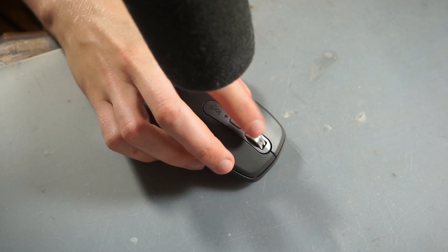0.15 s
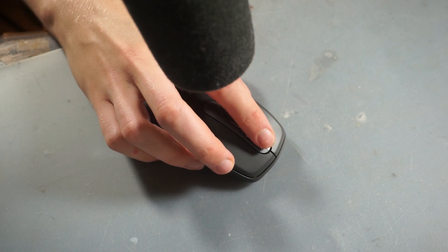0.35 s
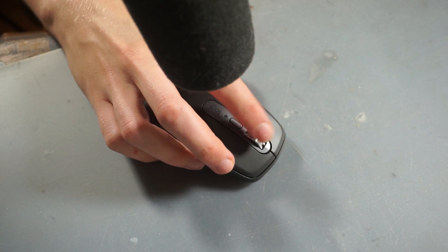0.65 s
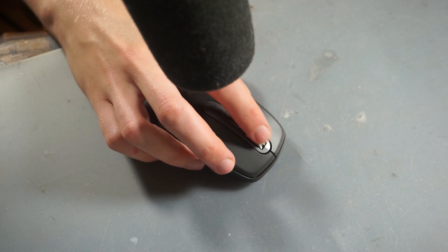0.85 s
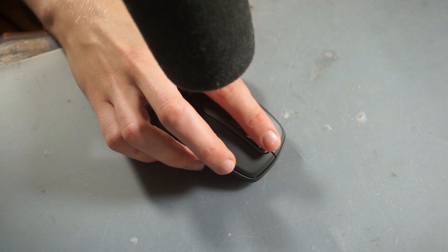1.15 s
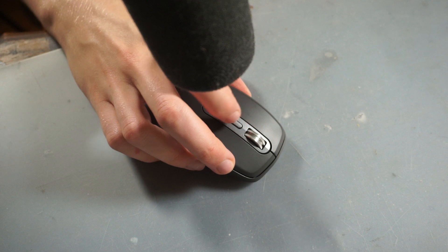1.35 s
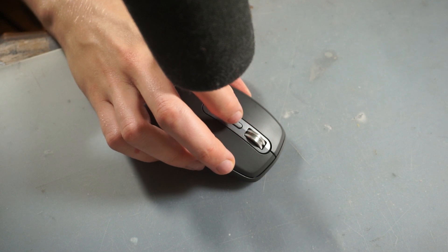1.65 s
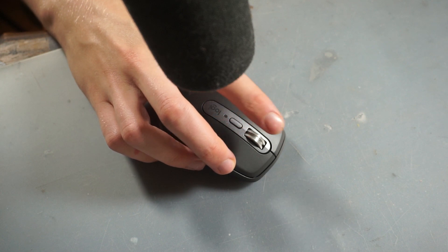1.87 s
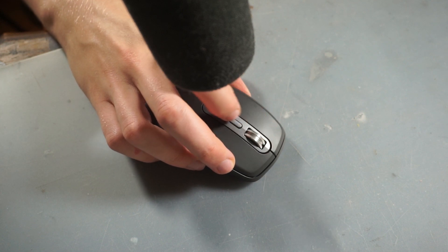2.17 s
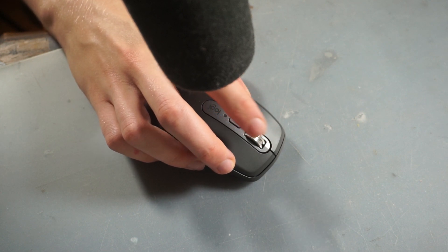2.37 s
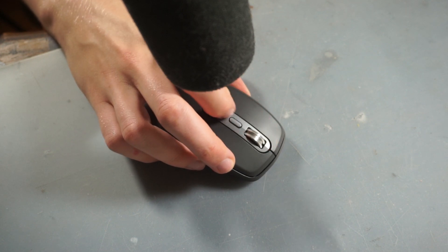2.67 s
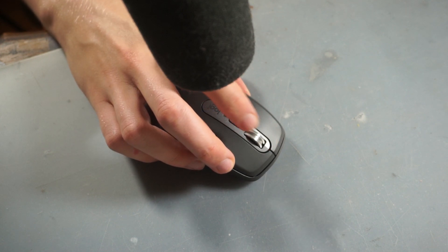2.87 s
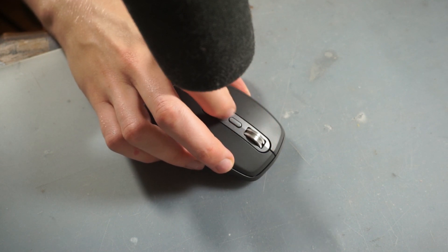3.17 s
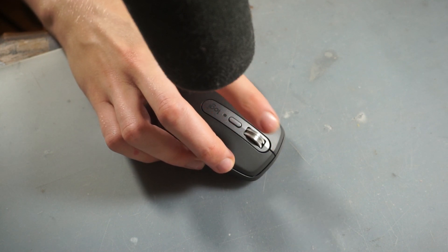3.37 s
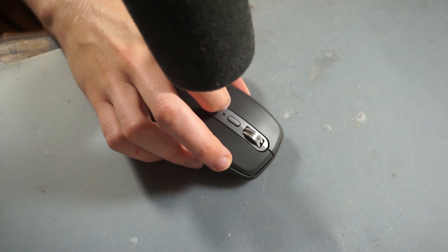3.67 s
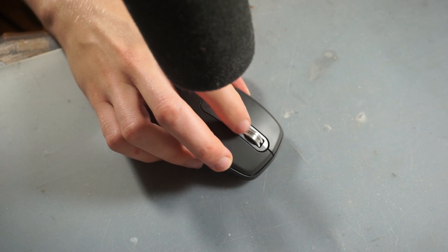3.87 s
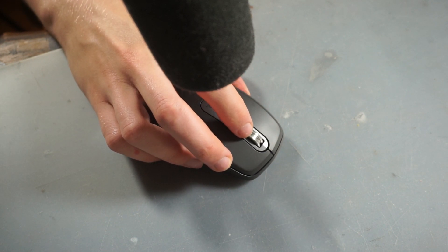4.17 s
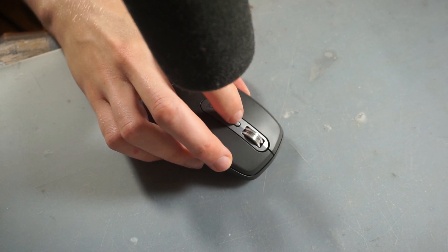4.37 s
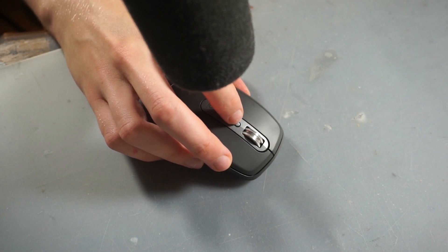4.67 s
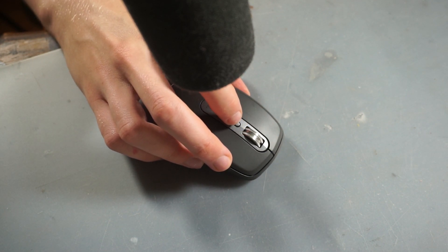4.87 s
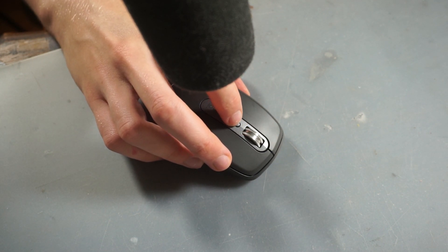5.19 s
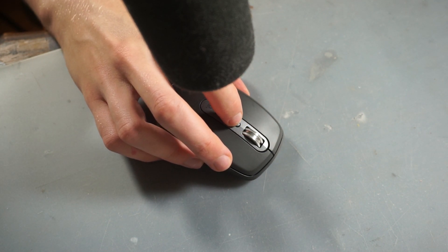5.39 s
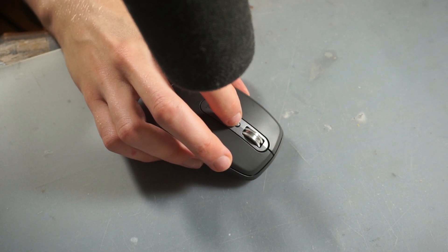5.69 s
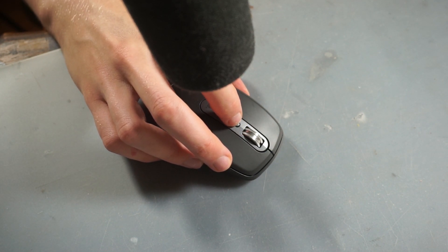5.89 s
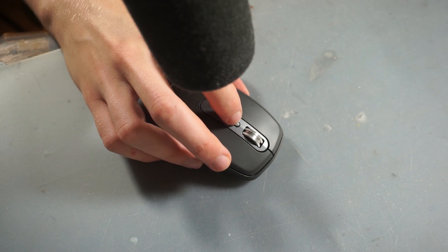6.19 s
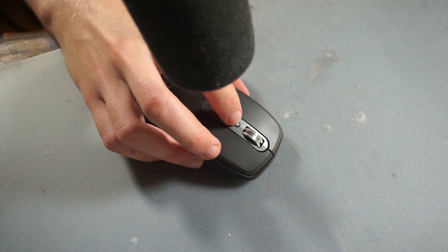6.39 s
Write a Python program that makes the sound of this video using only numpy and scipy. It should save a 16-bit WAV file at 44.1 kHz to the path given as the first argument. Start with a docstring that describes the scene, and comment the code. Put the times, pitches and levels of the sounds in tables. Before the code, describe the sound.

A hand handles a computer mouse, captured close. Muffled bumps through the desk come first, then snappy wheel slaps with woody thuds, hollow little tocks and brief squeaky skin-on-wheel scrapes. The second half is sparser: light ticks, then evenly paced sharp clicks with soft releases. A faint low rumble and steady hiss lie beneath, in a small-sounding, nearly dry room.

```python
"""A low room rumble with preamplifier hiss above it, then a hand taps, scrolls and clicks a computer mouse.
The floor is noise shaped in its spectrum; the desk rocks on its legs as one low, wandering mode.
The fingertip sticks and slips on the wheel, and these slips excite the modes of switch, shell and desk.
Every blow is a smooth push ringing desk and shell; most also chatter through the button and switch.
Knocks of the wheel add close modes that beat, and all contacts but the rocking leave a faint echo."""
import sys
import numpy as np
from scipy import signal
from scipy.fft import rfft, irfft
from scipy.io import wavfile
from scipy.ndimage import uniform_filter1d

SR = 44100
rng = np.random.default_rng(int(sys.argv[2]) if len(sys.argv) > 2 else 0)


def store_pcm(level_fs):
    """Save levels as 16-bit WAV."""
    pcm = np.round(np.clip(level_fs, -1, 1) * 32767).astype(np.int16)
    wavfile.write(sys.argv[1], SR, np.atleast_2d(pcm).T)


def voltage_ratio(level):
    """Linear amplitude factor for a level in decibels (scalar or array-like)."""
    return 10 ** (np.asarray(level, float) / 20)


N = 288414
T = np.arange(N) / SR  # seconds

# modes of the desk top: f/Hz, relative level before contact smoothing/dB, t60/s
DESK = [(30, 9, 0.087), (117, -1.5, 0.27), (146.6, -2.5, 0.3), (171, 13, 0.031), (199.7, -11, 0.22),
        (247, -16.5, 0.32), (290, -8, 0.13), (324, -28.5, 0.66), (413, -16, 0.18), (610, -15.5, 0.11)]
# modes of the plastic shell: f/Hz, relative level before contact smoothing/dB, t60/s
SHELL = [(939, 0.5, 0.027), (1094, -2, 0.04), (1226, 4, 0.028), (1364, -3, 0.012)]
# modes of the wheel in its cradle: f/Hz, relative level before contact smoothing/dB, t60/s
WHEEL = [(1170, 0, .028), (1250, -28, .22), (1275, -28, .1), (1325, 0, .028)]
# modes of the button cap: f/Hz, relative level/dB, t60/s
BUTTON = [(1610, 2, 0.0043), (1903, -15, 0.052), (2316, -6, 0.0072), (2583, -7.5, 0.023),
          (2780, -2.5, 0.0057), (3355, -4, 0.013), (3985, -17.5, 0.035)]
# modes of the switch: f/Hz, relative level/dB, t60/s
SWITCH = [(4570, -21, 0.027), (4840, -30, 0.026), (4920, 5.5, 0.0043), (5615, -4.5, 0.0053)]
# highest modes, heard as a crack: f/Hz, relative level/dB, t60/s
CRACK = [(6090, -1, 0.009), (6880, 1.5, 0.0091), (7280, -3, 0.0098), (8230, -1.5, 0.009),
         (9270, -1, 0.0072), (10870, -5.5, 0.011), (11450, -1, 0.006), (13100, -9, 0.015),
         (14900, -54, 0.006)]
# button presses: t/s, reference level of their parts and of the rocking/dB
PRESSES = [(4.685, -33), (5.15, -32), (5.521, -33), (5.834, -34.5), (6.404, -33)]
# dull button releases: t/s, reference level of their parts and of the rocking/dB
RELEASES = [(4.835, -34.5), (5.309, -34.5), (5.62, -34), (5.941, -34)]
# finger slapping the wheel, with its bounces: t/s, shell peak/dB, thud peak/dB, snap reference level/dB
KNOCKS = [(1.335, -40, -37.5, -38), (1.339, -37, -31, -34), (1.343, -46.5, -30.5, -39),
          (2.178, -46.5, -31.5, -48), (2.668, -45.5, -49.5, -51.5), (2.675, -55, -41.5, -49.5),
          (3.119, -32.5, -27, -29), (3.134, -54, -55, -63), (3.148, -56, -40, -62),
          (3.592, -44, -40.5, -46.5), (3.604, -64, -51, -50), (3.956, -82, -46.5, -69),
          (4.24, -50, -43, -78), (4.409, -59, -59.5, -57)]
# the wheel knocking back: t/s, wheel peak/dB, snap reference level/dB
TOCKS = [(1.397, -46.5, -46.5), (2.102, -44, -41.5), (2.231, -43, -44.5), (4.107, -47.5, -46.5),
         (4.736, -45.5, -46), (5.2, -40.5, -46), (5.883, -45.5, -47.5), (6.455, -40, -47)]


def add(out, s, sound):
    """Superposition: mix a sound in at time s."""
    i = max(int(s * SR), 0)
    out[i:i + len(sound)] += sound[:len(out) - i]


def peak(x, db):
    """Amplitude normalisation: scale to a peak level in dB."""
    return x * voltage_ratio(db) / np.abs(x).max()


def unit(x):
    """Power normalisation: scale to rms 1."""
    return x / np.sqrt(np.mean(x ** 2))


def ring(modes, seconds=0.23, sign=-1):
    """Modal superposition: an impulse response of damped sines; sign -1 opposes neighbours in phase."""
    t = T[:int(seconds * SR)]
    out = np.zeros(len(t))
    for k, (hz, db, t60) in enumerate(modes):
        decay = 1000. ** (-t / t60)
        out += sign ** k * voltage_ratio(db) * np.sin(2 * np.pi * hz * t) * decay
    return out


def soft(x, ms):
    """Contact time as a low-pass: a rounded force pulse about this long dulls the ring."""
    return signal.fftconvolve(x, np.hanning(int(ms * SR / 1000) + 3))


def hiss():
    """Spectral shaping of random noise: room rumble below, preamplifier hiss above."""
    # noise spectrum: f/Hz, relative density per Hz/dB
    noise_spectrum = [(12, -34), (20, -1.5), (40, -1.5), (56, 0.5), (86, -14.5), (172, -23), (262, -24),
                      (472, -31), (1190, -35.5), (1530, -37.5), (12400, -37.5), (16000, -39)]
    level_db = -68  # rms
    hz, db = np.transpose(noise_spectrum)
    f = np.maximum(np.arange(N // 2 + 1) * SR / N, 1)
    gain = voltage_ratio(np.interp(np.log(f), np.log(hz), db))
    noise = irfft(rfft(rng.standard_normal(N)) * gain, N)
    return voltage_ratio(level_db) * unit(noise)


def rocking():
    """A low mode of the desk on its legs: pushes add energy to one swing, held while the hand moves."""
    # pushes of the hand: t/s, swing amplitude/dB, hold/ms, t60/s
    hand_pushes = [(0.004, -38, 16, 0.48), (0.341, -50, 17, 0.27), (0.419, -47.5, 24, 0.55),
                   (0.463, -40, 42, 0.39), (0.81, -44, 32, 0.15), (0.894, -40.5, 49, 0.14),
                   (1.008, -53, 8.2, 0.24), (1.317, -45, 9, 0.23), (1.874, -60.5, 18, 0.83),
                   (2.006, -33, 4.1, 0.25), (2.156, -42, 11, 0.17), (2.617, -55, 25, 0.3),
                   (2.667, -42.5, 4.5, 0.37), (3.109, -31.5, 5.1, 0.47), (3.552, -39, 13, 0.32),
                   (3.594, -44, 16, 0.49), (3.956, -44.5, 7.3, 0.28), (4.409, -48.5, 8.8, 0.18),
                   (6.265, -65, 20, 0.26)]
    rock_hz, rise_ms = 59.8, 5
    click_hold_ms, click_t60 = 16, .33
    pushes = list(hand_pushes)
    # (clicks, swing re click level in dB, lead in ms): the desk moves before the switch snaps
    for clicks, rock_db, lead_ms in ((PRESSES, -18.5, 6.3), (RELEASES, -12.5, 3.4)):
        pushes += [(s - lead_ms / 1000, db + rock_db, click_hold_ms, click_t60) for s, db in clicks]

    energy, t = np.zeros(N), T[:SR]
    rise = np.sin(np.pi / 2 * np.clip(t * 1000 / rise_ms, 0, 1))
    for s, db, hold_ms, t60 in pushes:
        fall = 1000. ** (-np.maximum(t - (rise_ms + hold_ms) / 1000, 0) / t60)
        add(energy, s, (voltage_ratio(db) * rise * fall) ** 2)
    drift = unit(uniform_filter1d(rng.standard_normal(N), 3500))
    phase = 2 * np.pi * np.cumsum(rock_hz * (1 + 0.07 * drift)) / SR
    return np.sqrt(energy) * np.sin(phase)


def contact():
    """Energy addition of friction and rattle: amplitudes of squeak, shell noise and rumble over time."""
    # fingertip strokes: t/s, length/s, initial squeak/dB, initial shell noise/dB, initial rumble/dB
    rub_strokes = [(0.037, 0.012, -71, -90, -72), (0.446, .12, -98, -93, -70.5),
                   (0.522, 0.018, -76, -87, -75), (0.93, 0.11, -99, -83.5, -75),
                   (1.876, 0.21, -100, -80.5, -64.5), (2.567, 0.05, -78, -84, -75),
                   (2.674, 0.031, -59.5, -64, -60), (3.595, .015, -62.5, -75, -49.5),
                   (3.956, 0.059, -61, -68, -66)]
    # weakening of squeak, shell noise, rumble as the finger slows: rate/(dB/s)
    stroke_fade = (227, 116, 51)
    # wheel rattle, quick then slow: shell noise re knock shell/dB, rumble re knock thud/dB, t60/s
    wheel_rattle = [(-7.5, -10.5, 0.043), (-35, -22.5, .35)]
    touch_s, lift_t60 = 0.004, 0.082
    energy, t = np.zeros((3, N)), T[:SR // 2]
    onset = np.clip(t / touch_s, 0, 1)
    for s, length, *levels in rub_strokes:
        touch = onset * 1000. ** (-np.maximum(t - length, 0) / lift_t60)
        for layer, db, fade in zip(energy, levels, stroke_fade):
            add(layer, s, (voltage_ratio(db - fade * t) * touch) ** 2)

    squeak, shell, rumble = energy
    knocks = [k[:3] for k in KNOCKS]
    knocks += [(s, db - 4, db + 1) for s, db, _ in TOCKS]  # knocking back counts as a knock
    for s, shell_db, thud_db in knocks:
        for shell_rel_db, rumble_rel_db, t60 in wheel_rattle:
            fall = onset * 1000. ** (-t / t60)
            add(shell, s, (voltage_ratio(shell_db + shell_rel_db) * fall) ** 2)
            add(rumble, s, (voltage_ratio(thud_db + rumble_rel_db) * fall) ** 2)
        # treble of the slow rattle, 15 dB under its shell noise
        slow_rel_db, _, slow_t60 = wheel_rattle[-1]
        slow_fall = onset * 1000. ** (-t / slow_t60)
        add(squeak, s, (voltage_ratio(shell_db + slow_rel_db - 15) * slow_fall) ** 2)
    return np.sqrt(energy)


def rubbing():
    """Stick-slip friction: skin slipping on the wheel rings switch and shell and shakes the desk."""
    # slipping slows as the stroke ends: t/s, nominal slip rate/Hz, slowing/(Hz/s), unevenness/0-1
    slip_rates = [(2.678, 1250, 2500, .07), (3.597, 1300, 2500, .3), (3.957, 1380, 14000, .04)]
    slip_rows = np.array(slip_rates)
    current = np.maximum(np.searchsorted(slip_rows[:, 0], T) - 1, 0)
    s, hz, slowing, uneven = slip_rows[current].T
    rate = np.clip(hz - slowing * (T - s), 500, 1500)
    jitter = unit(uniform_filter1d(rng.standard_normal(N), 30))
    phase = 2 * np.pi * np.cumsum(rate * np.exp(uneven * jitter)) / SR
    slips = np.exp(120 * (np.cos(phase) - 1))  # one narrow pulse per cycle
    scrape, drag = rng.standard_normal((2, N))
    force = unit(slips - slips.mean()) + .4 * scrape

    bright = ring(SWITCH, .05) + voltage_ratio(-6.0) * ring(CRACK, .05) + voltage_ratio(-5.5) * ring(BUTTON, .05)
    plastic = soft(soft(ring(SHELL, .1) + ring(WHEEL, .1), .6), .6)  # soft skin carries no treble
    desk = np.diff(soft(soft(ring(DESK[1:], .12, sign=1), 1.5), 1.5))
    skin_band = signal.butter(3, [350, 1600], "bandpass", fs=SR, output="sos")
    skin = signal.sosfilt(skin_band, drag)

    squeak = unit(signal.fftconvolve(force, bright)[:N])
    shell_noise = unit(signal.fftconvolve(scrape, plastic)[:N])
    rumble = unit(signal.fftconvolve(drag, desk)[:N]) + voltage_ratio(-13.5) * unit(skin)
    return np.sum(contact() * [squeak, shell_noise, rumble], axis=0)


def room(x):
    """Diffuse reverberation: convolution with decaying, band-limited noise gives a faint, dull echo."""
    level_db, t60 = -32, 0.74
    t = T[:SR // 2]
    tail = rng.standard_normal(len(t)) * 1000. ** (-t / t60) * (t > 3 / 1000)
    dull = signal.butter(1, [300, 5000], "bandpass", fs=SR, output="sos")
    tail = signal.sosfilt(dull, tail)
    tail = tail / np.sqrt(np.sum(tail ** 2))
    return voltage_ratio(level_db) * signal.fftconvolve(x, tail)[:N]


def thud(scatter, ms):
    """Forced modal response: a rounded push into the desk reaches its modes a little differently each time."""
    modes = [(hz * (1 + .02 * a), db + 3 * b, t60) for (hz, db, t60), (a, b) in zip(DESK, scatter)]
    return np.diff(soft(ring(modes, .35, sign=1), ms))  # pressure follows the change of speed


def flutter(x):
    """Amplitude modulation: the resting hand loads the desk unevenly, so a ring comes to waver."""
    shake = rng.standard_normal(len(x))
    for _ in range(2):
        shake = uniform_filter1d(shake, 500)
    onset = np.clip(T[:len(x)] / .03, 0, 1)  # the wavering grows in over 30 ms
    return x * (1 + .5 * onset * unit(shake))


def snaps(count, decay_ms):
    """Micro-impact excitation: one sharp impact, then noisy chatter falling by 1/e in decay_ms."""
    t = T[:400]
    impact = (t == 0) * 7.0
    chatter = rng.standard_normal((count, len(t))) * np.exp(-t * 1000 / decay_ms)
    return impact + chatter


def blows():
    """Impulsive excitation of modes: a push thuds into desk and shell; the hard parts snap and chatter."""
    # soft fingertip touches: t/s, shell peak/dB, thud peak/dB
    finger_touches = [(0.046, -66, -60), (0.151, -76, -60.5), (0.346, -78, -67), (0.479, -79, -53.5),
                      (0.531, -82, -55.5), (0.655, -73.5, -56.5), (0.813, -83, -59.5), (1.874, -92, -64),
                      (2.014, -60.5, -38.5), (2.114, -73, -47), (2.168, -59, -48), (2.172, -55, -35.5),
                      (3.551, -65, -55), (3.632, -55.5, -41.5), (4.965, -69.5, -70), (6.131, -70.5, -70)]
    # light ticks of the button cap: t/s, shell peak/dB, thud peak/dB, tick reference level/dB
    cap_ticks = [(1.384, -63, -66, -69), (3.262, -60, -55, -66), (4.457, -62, -63.5, -62),
                 (4.87, -56.5, -59, -69.5), (6.268, -54.5, -46, -62.5)]
    # desk modes that hum on after hard knocks: t/s, peak before wavering/dB, f/Hz
    desk_hums = [(1.345, -47.5, 249.4), (2.178, -43.5, 324), (2.18, -46.5, 610), (3.12, -52.5, 117)]
    # parts of a press re its level: shell/dB, thud/dB, button/dB, switch/dB, crack/dB
    press_parts = (-12.5, -1.6, -21.5, -2.1, -12)
    # parts of a release re its level: shell/dB, thud/dB, button/dB, switch/dB, crack/dB
    release_parts = (-13, -0.26, -42, -37, -45)
    # hard parts of a knock re its snap: button/dB, switch/dB, crack/dB
    knock_parts = (-7.5, -0.8, -11)
    # hard parts of a tick re its level: button/dB, switch/dB, crack/dB
    tick_parts = (8.2, -4, -2.5)
    thud_ms, slap_ms = 2.82, 1.93  # a slap is a shorter push
    # t/s, direction of force, push/ms, then peaks/dB; a release pulls
    rows = [(s, 1, thud_ms, *(db + np.array(press_parts))) for s, db in PRESSES]
    rows += [(s, -1, thud_ms, *(db + np.array(release_parts))) for s, db in RELEASES]
    rows += [(s, 1, slap_ms, a, b, *(db + np.array(knock_parts))) for s, a, b, db in KNOCKS]
    rows += [(s, 1, thud_ms, a, b, *(db + np.array(tick_parts))) for s, a, b, db in cap_ticks]
    rows += [(s, 1, thud_ms, a, b) for s, a, b in finger_touches]

    out = np.zeros(N)
    shell = soft(ring(SHELL, .1), 0.36)
    hard = [ring(m, .06) for m in (BUTTON, SWITCH, CRACK)]
    scatter = rng.standard_normal((len(rows), len(DESK), 2))
    for row, snap, spot in zip(rows, snaps(len(rows), 0.95), scatter):
        s, direction, push_ms, shell_db, thud_db, *hard_db = row
        desk = peak(flutter(thud(spot, push_ms)), thud_db)
        add(out, s - .0012, direction * desk)  # the force builds before the snap
        add(out, s, direction * peak(shell, shell_db))
        for body, db in zip(hard, hard_db):
            add(out, s, peak(signal.fftconvolve(body, snap), db))

    for s, db, hz in desk_hums:
        hum = ring([(hz, 0, 86 / hz)], 0.56)  # 86 cycles to fall by 60 dB
        add(out, s, flutter(peak(hum, db)))

    # the button cap sings after a knock and buzzes against its seat
    cap_hz, cap_db, cap_t60, rough_ms = 2630, -37.5, 0.36, 3.2  # level re the snap, before the buzz
    for s, _, _, db in KNOCKS:
        cap = peak(ring([(cap_hz, 0, cap_t60)], 0.55), db + cap_db)
        buzz = unit(soft(rng.standard_normal(len(cap)), rough_ms))[:len(cap)]
        add(out, s, cap * buzz)
    return out


def tocks():
    """Beating of close modes: the wheel knocks back in its cradle, swells for a few ms, then cancels."""
    # hard parts of a wheel knock re its snap: button/dB, switch/dB, crack/dB
    tock_parts = (-13.5, -8, -5.1)
    out = np.zeros(N)
    wheel = soft(ring(WHEEL), 0.53)
    hard = [ring(m, .06) for m in (BUTTON, SWITCH, CRACK)]
    for (s, wheel_db, snap_db), snap in zip(TOCKS, snaps(len(TOCKS), 0.34)):
        add(out, s, peak(wheel, wheel_db))
        for body, db in zip(hard, tock_parts):
            add(out, s - .001, peak(signal.fftconvolve(body, snap), snap_db + db))
    return out


def scene():
    """Linear superposition of mouse and desk, their echo, the rocking and the noise floor."""
    near = rubbing() + blows() + tocks()
    return (hiss() + rocking() + near + room(near))[None]


def band_limit(x):
    """A steep low-pass at the top of the band."""
    return signal.sosfilt(signal.butter(12, 16410, fs=SR, output="sos"), x)


def record(dry):
    """High-pass response of the microphone: it drops the deepest bass."""
    bass_cut = signal.butter(2, 28, "highpass", fs=SR, output="sos")
    mix = signal.sosfilt(bass_cut, dry)
    return band_limit(mix)


dry = scene()
out = record(dry)
store_pcm(out)
```